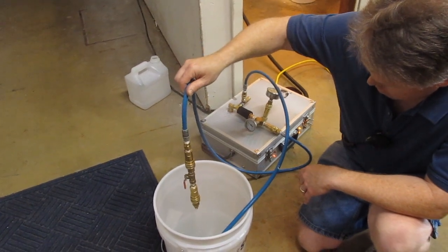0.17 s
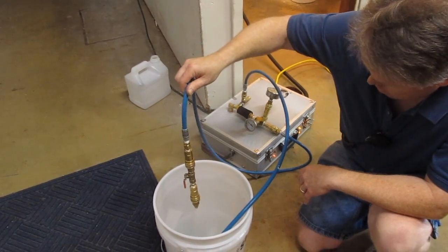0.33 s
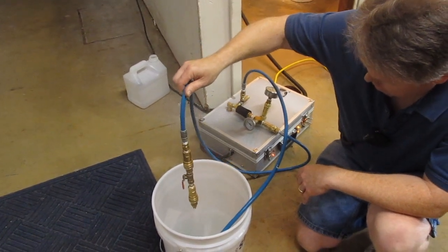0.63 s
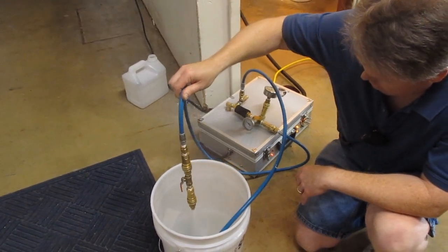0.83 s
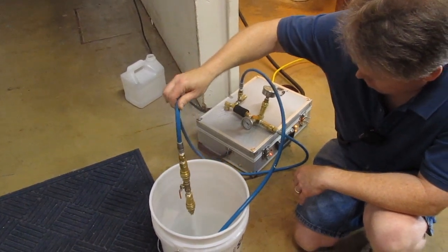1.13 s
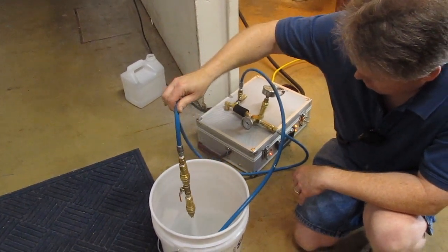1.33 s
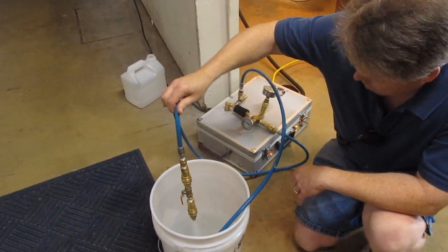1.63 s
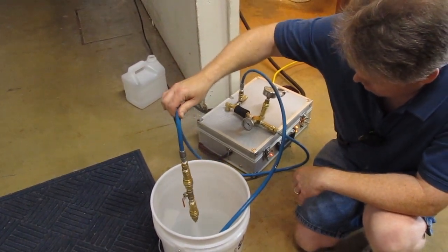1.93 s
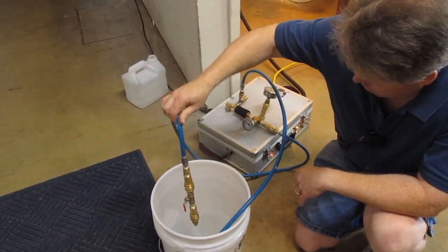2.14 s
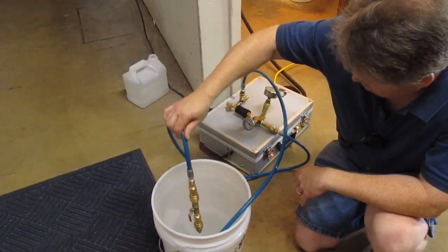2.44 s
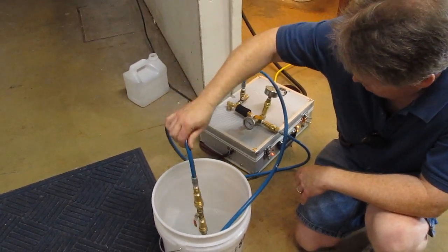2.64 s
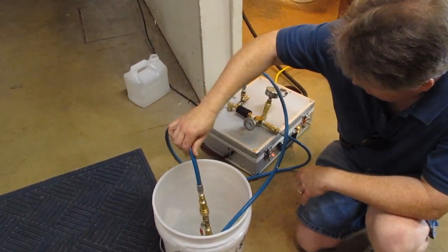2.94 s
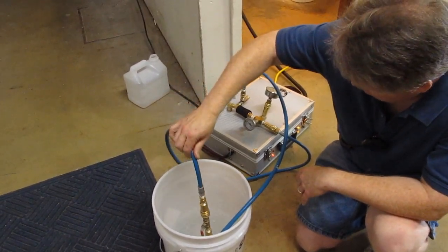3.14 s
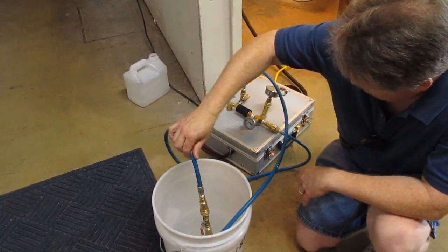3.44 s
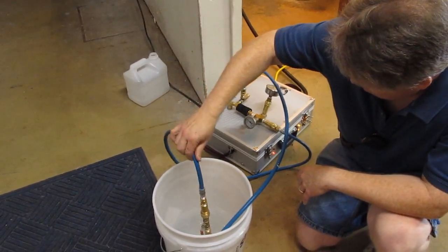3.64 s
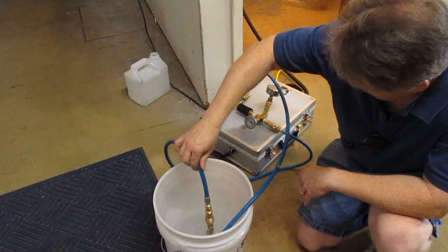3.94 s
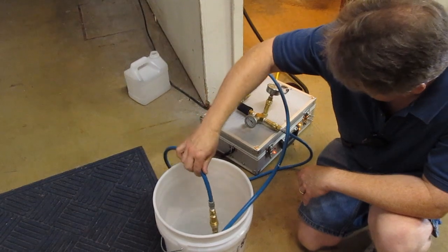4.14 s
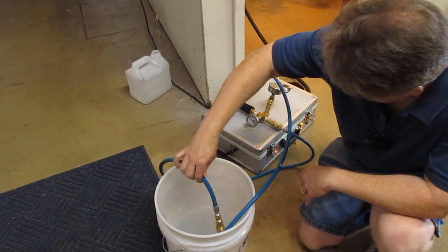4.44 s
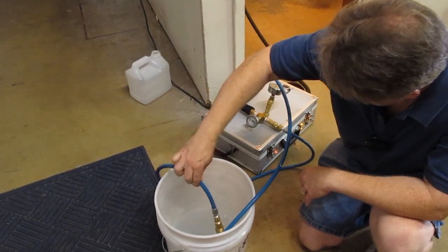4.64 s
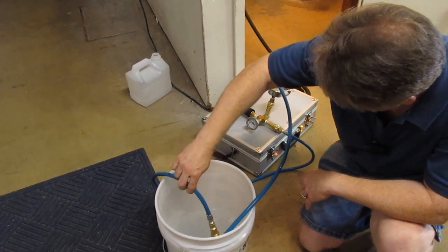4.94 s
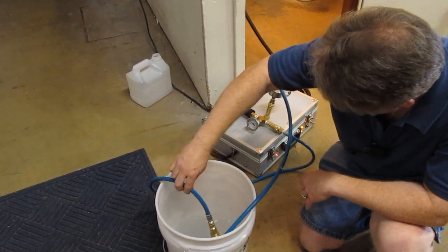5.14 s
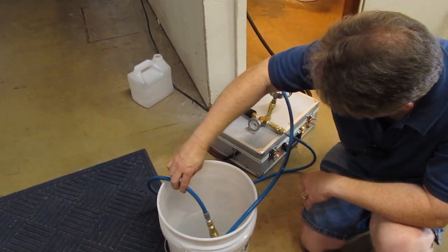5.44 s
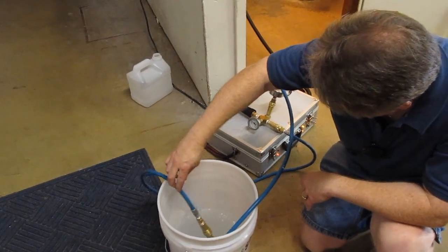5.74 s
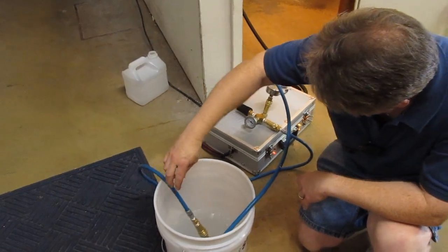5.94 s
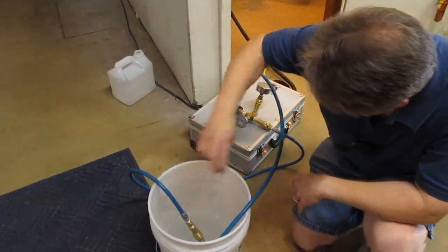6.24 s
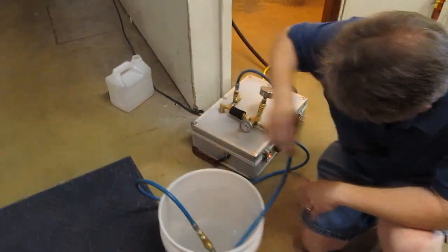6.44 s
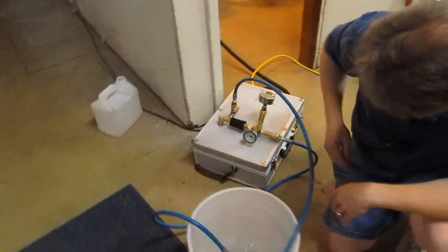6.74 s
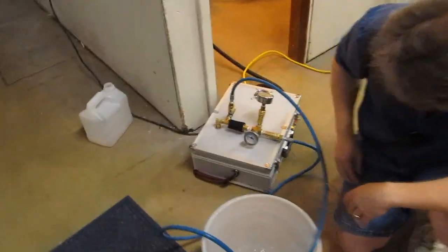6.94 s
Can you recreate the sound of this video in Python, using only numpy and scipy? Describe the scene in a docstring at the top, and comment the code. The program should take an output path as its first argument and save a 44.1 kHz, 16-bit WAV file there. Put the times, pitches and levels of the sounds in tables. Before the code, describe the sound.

A small electric pump hums while a nozzle sprays hissing water into a plastic bucket, plunges under with gulping bubbles, then scours the ringing wall.

```python
"""A small electric pump and its fan motor hum on a hard floor (sine tones, coloured noise) throughout, while
a hand-held nozzle sprays water into a plastic bucket (noise hiss and sizzle). The nozzle is lowered: from 2 s
the jet churns up froth and bubbles (patchy noise, damped sines). At 3.6 s it plunges under: a typed recorder
gain curve ducks the hum, gulps pass over bubble clouds and fizz. From 4.8 s it scours the wall and the bucket
rings (resonant noise)."""
import sys
import numpy as np
from scipy import signal
from scipy.fft import rfft, irfft, next_fast_len
from scipy.io import wavfile
from scipy.ndimage import uniform_filter1d, map_coordinates

SR = 44100
rng = np.random.default_rng(int(sys.argv[2]) if len(sys.argv) > 2 else 0)


def materialize(psi):
    """Save the field psi as 16-bit PCM at rate SR to the path in sys.argv[1].

    A 1-D psi becomes a single channel; in a 2-D psi each row is a channel.
    """
    bounded = np.clip(np.atleast_2d(psi).T, -1, 1)
    quanta = np.round(bounded * 32767).astype(np.int16)
    wavfile.write(sys.argv[1], SR, quanta)


def volts_from_db(level):
    """Convert decibel levels to linear amplitude ratios."""
    exponent = np.asarray(level, float) / 20
    return 10 ** exponent


N = 312669

# Spectra (f/Hz, level/dB per Hz) give the colour only: the noise is scaled to rms 1 before its gain.
# hum level as heard, with the recorder's slow gain changes, before the gain duck: t/s, level/dB
HUM_LEVEL = [(0, -39.5), (1.5, -41), (2.2, -40), (3.1, -36.5), (3.55, -36.5), (4.5, -36.5), (6.2, -39.5),
             (6.7, -38), (7.09, -38.5)]
# magnetic hum re hum level: f/Hz, level/dB rms (first row: only f is used, its level is 0 dB)
MAINS_TONES = [(119.95, -5), (239.9, -2.5)]
# beat of twice the fan's speed with the mains hum: rate/Hz, time of a swell/s, level re first hum tone/dB
FAN_BEAT = (2.02, 0.54, -16)
# fan motor tones re hum level: f/Hz, level/dB rms
FAN_TONES = [(58.96, -20.5), (144.7, -15.5), (190.5, -17.5), (522, -17.5), (589.7, -19)]
# pump shaft orders re hum level: multiple of shaft rate, level/dB rms
SHAFT_ORDERS = [(3, -25), (4, -33), (5, -20), (6, -13), (8, -28), (9, -11), (11, -4.5), (12, -10.5),
                (14, -19.5), (16, -14), (18, -7.5), (20, -18), (22, -18.5), (24, -11), (27, -16.5)]
# rush of the pump case: f/Hz, level/dB per Hz
CASE_SPECTRUM = [(12, -55), (20, -23), (65, -21), (90, -14), (118, -16), (183, -11.5), (245, -2.5),
                 (360, -4), (519, -5.5), (890, -10), (1280, -5.5), (1560, -8.5), (2000, -9), (2600, -23),
                 (4400, -120)]
# faint steady hiss of the room: f/Hz, level/dB per Hz
ROOM_SPECTRUM = [(1500, -40), (3000, -3), (8000, 0), (12000, -7), (15800, -5)]
# open spray as the nozzle is lowered, before spits: t/s, hiss level/dB, top sizzle level/dB
SPRAY_LEVELS = [(0, -20, -24.5), (.5, -18.5, -21.5), (1.16, -20.5, -23.5), (1.75, -19.5, -24),
                (2.32, -21, -25), (2.77, -20.5, -27), (3.0, -23.5, -30.5), (3.35, -20, -28),
                (3.65, -22.5, -23)]
# spray hiss: f/Hz, level/dB per Hz
HISS_SPECTRUM = [(410, -50), (700, -28), (804, -9.5), (871, -21), (1020, -24), (1260, -15.5), (1950, -10),
                 (2760, -2.5), (3100, -5.5), (4430, -1.5), (5380, -3.5), (6470, 0.5), (7870, -1.5),
                 (11000, -9), (14300, -17), (22000, -120)]
# top sizzle of the spray: f/Hz, level/dB per Hz
SIZZLE_SPECTRUM = [(5290, -33), (9000, -2), (12800, -2), (15100, -7.5), (15700, -10)]
# the nozzle spits at the surface: t/s, length/s, hiss lift/dB, sizzle lift/dB
SPITS = [(2.888, .04, 1, 3), (3.0, .05, -3, 6), (3.056, .06, 2.5, 1), (3.17, .03, -1, 5),
         (3.227, 0.063, -2, 7.5), (3.517, 0.027, 3, 8), (3.564, .03, 5, 2), (3.613, 0.04, 4.5, 9)]
# depth of the jet's bite in the water, as froth level: t/s, level/dB
FROTH_LEVEL = [(2.0, -37), (2.47, -27), (2.93, -24), (3.44, -25.5), (3.65, -30)]
# froth: f/Hz, level/dB per Hz
FROTH_SPECTRUM = [(500, -33), (800, -10.5), (1300, -5), (1740, -3.5), (2020, -7.5), (2300, 2.5),
                  (2560, -3.5), (2880, -3.5), (3200, -6), (4300, -6.5), (5500, -14), (7200, -38),
                  (12000, -120)]
# large single bubbles: t/s, level before swell and decay/dB, starting f/Hz, t60/s
LARGE_BUBBLES = [(2.445, -23, 1298, 0.12), (2.5, -24, 263, 0.25), (2.895, -17, 335, 0.15),
                 (3.0, -24, 285, .25), (3.04, -23, 290, .2), (3.185, -19, 260, .18), (3.225, -19, 269, .2),
                 (3.285, -19, 276, .2), (3.33, -19, 282, .15), (3.38, -14.5, 270.5, 0.21),
                 (3.486, -12, 306, 0.11), (3.571, -17.5, 266, 0.16), (3.77, -27, 739, 0.062),
                 (4.11, -19.5, 703, 0.06), (4.271, -22.5, 1240, 0.19)]
# jet under water, gathering force, before gulps: t/s, fizz level/dB, finest fizz level/dB
FIZZ_LEVELS = [(3.64, -33, -40), (3.72, -36, -49), (4.07, -34.5, -48), (4.17, -32, -44), (4.21, -29, -36.5),
               (4.31, -27.5, -37.5), (4.35, -26.5, -29.5), (4.64, -22, -21.5), (4.775, -17.5, -21.5)]
# fizz: f/Hz, level/dB per Hz
FIZZ_SPECTRUM = [(700, -26), (1200, -14), (1800, -9.5), (2300, -3.5), (3100, -4.5), (4000, -11), (4600, -4),
                 (5500, -10), (6300, -11), (8000, -24), (10400, -46), (17000, -120)]
# finest fizz: f/Hz, level/dB per Hz
FINEST_SPECTRUM = [(4120, -22), (7000, -5), (8700, -4), (9990, -8.5), (11300, -12.5), (12100, -15),
                   (14000, -19), (15700, -26)]
# centre pitch of the bubble cloud: t/s, f/Hz
CLOUD_PITCH = [(3.64, 2400), (3.95, 2650), (4.12, 2405), (4.3, 2260), (4.62, 2200), (4.7, 2750),
               (4.775, 2950)]
# gulps of air pass the sunken nozzle: t/s, length/s, lift/dB, small-bubble cloud level/dB
GULPS = [(3.78, 0.077, 3.5, -34), (3.867, .07, 6.5, -43), (3.957, .06, 9.5, -29.5), (4.122, 0.065, 6, -56),
         (4.198, 0.035, 3, -34), (4.268, 0.076, 1.5, -25.5), (4.339, 0.048, 1, -27), (4.4, .08, -0.5, -33),
         (4.48, .1, 1.5, -31), (4.594, 0.14, -0.5, -29.5), (4.697, .1, 0.5, -39)]
# jet on the wall: t/s, ringing level/dB, scour level/dB
WALL_LEVELS = [(4.79, -20.5, -25), (5.24, -19, -22.5), (5.6, -19.5, -22.5), (5.71, -18.5, -19.5),
               (6.1, -20, -22.5), (6.33, -18.5, -22), (7.09, -17.5, -24.5)]
# bucket modes: f/Hz, width/Hz, level/dB for each of five resting places of the nozzle
BUCKET_MODES = [(1074, 40, -16, -19, -23, -17, -24), (1228, 21.5, -6, -3, -8, -14, -6),
                (1351, 27, -1.5, -3, -5.5, -11.5, -12), (1513, 29, -5, -1.5, -6, -14, -5),
                (1608, 35, -2.5, -1, -2, -10, -4), (1714, 47, -4, -0.5, -5, -7.5, 0.5),
                (1856, 40, -15, -6, -5, -10, -11), (1994, 40, -8.5, -7, -2.5, -3, -5),
                (2150, 35, -19, -1.5, -10, -6, -1), (2216, 37, -13, 0.5, -1.5, -2.5, -0.5),
                (2487, 83, -18, -10, -11, -18, -4.5), (2757, 90, -11.5, -14, -8.5, -10.5, -4.5),
                (2945, 52, -13, -9, -9, -4.5, -6), (3417, 55, -12, -13, -6.5, -15, -8),
                (4190, 230, -15.5, -16, -16.5, -22, -17), (4840, 200, -16.5, -12, -16, -22, -16),
                (5270, 120, -18, -10, -9, -11.5, -8), (5460, 90, -22, -20, -18, -20, -3),
                (5780, 67, -15, -9, -6, -10.5, -5), (6106, 62, -16, -2.5, -0.5, -17, -5),
                (6320, 88, -31, -11, -16, -10, 0.5), (6870, 105, -22, -4.5, -8, -11.5, -3.5),
                (7220, 130, -14, -9, -7, -13, -10), (8100, 410, -20, -14, -16, -21.5, -24)]
# the nozzle shifts to its next resting place: mid t/s, length/s
NOZZLE_SHIFTS = [(5.38, 0.32), (5.79, 0.17), (6.202, 0.094), (6.73, 0.34)]
# scouring wash: f/Hz, level/dB per Hz
WASH_SPECTRUM = [(530, -29), (900, -14.5), (1510, -26), (1700, -2.5), (2430, -9), (3020, -1.5),
                 (3830, -9.5), (7060, -7), (12800, -17.5), (15700, -29)]
# two microphones in the open air: f/Hz, likeness 0-1, left lead/rad
OPEN_EARS = [(100, 0.94, 0), (400, 1, 0), (646, 0.71, -0.047), (1500, 0.99, 0.35), (2900, 0.65, -.2),
             (4000, 0.63, -0.6), (5100, .5, -0.03), (6030, 0.37, 0.21), (6700, 0.82, 0), (9000, 0.76, 0.27),
             (12300, 0.63, .25), (13300, 0.6, .9), (15500, .8, 0)]
# two microphones on sounds inside the bucket: f/Hz, likeness 0-1, left lead/rad
BUCKET_EARS = [(100, .99, 0), (600, 0.97, 0.85), (1540, 0.75, 0), (2430, 0.73, -0.78), (4000, 0.65, -0.91),
               (5500, 0.48, -0.063), (7600, 0.78, 0.82), (9500, 0.24, -0.62), (10900, 0.61, -0.063),
               (12000, .25, -1.4), (13000, .3, -.6), (15500, .55, -.2)]
# stereo balance: f/Hz, left minus right/dB
BALANCE = [(60, -3), (130, -2.5), (290, -2.5), (640, -0.5), (1410, -2), (3100, -2.0), (6820, -2.5),
           (15000, -3.0)]
# narrow notch of the recorder: f/Hz, width/Hz, depth 0-1
RECORDER_NOTCH = (7870, 110, .66)

PUMP_HZ = 24.73
PLUNGE_S = 3.622  # the nozzle goes under water
DUCK_DB, DUCK_RECOVERY_S = -9, 0.21  # recorder gain duck on the hum at the loud plunge; its recovery
CHOKE_S, LINGER_DB, LINGER_T60_S = 0.0022, -11.5, 0.43  # water shuts the spray off; a weak echo lingers
GURGLE_DB, GURGLE_RISE_DB_PER_S, GURGLE_LUMPS_DB = -31, 16, 2  # level from 3 s; rise until then; unevenness
CLOUD_DB, CLOUD_DB_PER_FIZZ_DB = -33.5, 0.73  # bubble cloud at a fizz of -30 dB; growth with fizz
FIZZ_SHARE = 0.84  # share of a gulp's lift in dB that the fizz takes
BAND_LIMIT_HZ = 15770


def unit(x):
    """Scale to rms 1."""
    return x / np.sqrt(np.mean(x ** 2) + 1e-20)


def along(points, hz, axis=1):
    """One column of (f/Hz, values) points on a log axis."""
    table = np.transpose(points)
    return np.interp(np.log(hz + 1), np.log(table[0] + 1), table[axis])


def gains(rows, fade_s=0.025):
    """Gain per sample for each dB column, fading outside the rows."""
    s, *columns = np.transpose(rows)
    t = np.arange(N) / SR
    fade = np.clip(np.minimum(t - s[0], s[-1] - t) / fade_s + 1, 0, 1)
    return np.array([fade * volts_from_db(np.interp(t, s, column)) for column in columns])


def wobble(rate_hz):
    """Smooth random curve, rate_hz knots a second."""
    knots = rng.standard_normal(int(N * rate_hz / SR) + 4)
    return map_coordinates(knots, [np.arange(N) * rate_hz / SR])


def bumps(rows):
    """One smooth hump of height 1 per (t/s, length/s) row."""
    s, length_s = np.transpose(rows)[:2, :, None]
    return np.exp(-(2 * (np.arange(N) / SR - s) / length_s) ** 2)


def in_air():
    """Gain 1 until the plunge, then a quick cut and a weak decaying echo."""
    after_s = np.maximum(np.arange(N) / SR - PLUNGE_S, 0)
    cut = (1 - volts_from_db(LINGER_DB)) * np.exp(-after_s / CHOKE_S)
    return cut + volts_from_db(LINGER_DB - 60 * after_s / LINGER_T60_S)


def filtered(x, response):
    """x times a complex response of frequency."""
    m = next_fast_len(N + 8192)
    return irfft(rfft(x, m) * response(np.fft.rfftfreq(m, 1 / SR)), m)[..., :N]


def shape(points):
    """Response of a (f/Hz, level/dB) spectrum."""
    return lambda hz: volts_from_db(along(points, hz))


def resonant(modes):
    """Sum of second-order resonances (f/Hz, width/Hz, level/dB) of alternating sign."""
    def mode(f, centre, width, db):
        return volts_from_db(db) * 1j * f * width / (centre * centre - f * f + 1j * f * width)
    return lambda f: sum((-1) ** k * mode(f, *row) for k, row in enumerate(modes))


def spread(pair, response, ears):
    """Two unrelated sounds coloured and mixed to left and right of given likeness and phase; rms 1."""
    def mid_side(hz):
        angle = np.arccos(np.clip(along(ears, hz), -1, 1)) / 2
        return response(hz) * [np.cos(angle), np.sin(angle)]

    def lead(hz):
        return np.exp(.5j * along(ears, hz, axis=2) * np.array([[1], [-1]]))

    mid, side = filtered(pair, mid_side)
    return unit(filtered(np.array([mid + side, mid - side]), lead))


def rush(response, ears, patchy_db, spiky_db):
    """Stereo noise: patches of random gain, and droplets that spike within milliseconds; rms 1."""
    spiky = rng.standard_normal((2, N)) * volts_from_db(spiky_db * wobble(700))
    z = signal.stft(spiky, nperseg=512)[2]
    field = uniform_filter1d(rng.standard_normal(z.shape[1:]), size=6, axis=0)
    field = uniform_filter1d(field, size=12, axis=1)
    patchy = signal.istft(z * volts_from_db(patchy_db * unit(field)), nperseg=512)[1][:, :N]
    return spread(patchy, response, ears)


def tones(lines, waver_db, drift_s):
    """Sines of given rms dB, each wavering a little; drift_s shifts them all in time."""
    t = np.arange(N) / SR
    out = 0
    for hz, db in lines:
        sine = np.sin(2 * np.pi * (hz * (t + drift_s) + rng.random()))
        out = out + 2 ** .5 * volts_from_db(db + waver_db * wobble(7)) * sine
    return out


def cloud(s, hz, ears, count, scatter, cycles, size_db):
    """Bubbles: damped sines of rising pitch scattered around a moving centre; rms 1 while they last."""
    when = rng.random((2, count, 1))
    high = rng.standard_normal((2, count, 1))
    big = rng.exponential(size=(2, count, 1))
    start = s[0] + when * (s[-1] - s[0])
    k = np.arange(int(10 * cycles * SR / np.min(hz)))
    turns = np.interp(start, s, hz) * np.exp(scatter * high) * k / SR
    envelope = volts_from_db(size_db * big) * np.exp(scatter * high / 2) * turns * np.exp(-turns / cycles)
    rings = envelope * np.sin(2 * np.pi * turns * (1 + .0012 * turns))
    pair = [np.bincount((i + k).ravel(), ring.ravel(), N)[:N]
            for i, ring in zip((start * SR).astype(int), rings)]
    stereo = spread(np.array(pair), lambda f: f ** 2 / (f ** 2 + 210 ** 2), ears)
    return stereo * np.sqrt((s[-1] - s[0]) * SR / N)


def machine():
    """Mains hum, fan tones, pump orders on a shaft whose speed wanders, rush of the case, room hiss."""
    t = np.arange(N) / SR
    duck_db = DUCK_DB * (1 - in_air()) * np.exp(-np.abs(t - PLUNGE_S) / DUCK_RECOVERY_S)
    level = gains(HUM_LEVEL)[0] * volts_from_db(duck_db)
    beat_hz, swell_s, beat_db = FAN_BEAT
    beat = 1 + volts_from_db(beat_db) * np.exp(-2j * np.pi * beat_hz * (t - swell_s))
    turn = np.exp(2j * np.pi * MAINS_TONES[0][0] * t) * beat
    hum = 2 ** .5 * turn.real + tones(MAINS_TONES[1:], waver_db=1.0, drift_s=0)
    fan = tones(FAN_TONES, waver_db=2.5, drift_s=0)
    orders = [(k * PUMP_HZ, db) for k, db in SHAFT_ORDERS]
    pump = tones(orders, waver_db=2.0, drift_s=.0012 * wobble(1.5) + 0.00026 * wobble(12))
    room = volts_from_db(-17) * rush(shape(ROOM_SPECTRUM), OPEN_EARS, patchy_db=.5, spiky_db=1)
    case = volts_from_db(2.5) * rush(shape(CASE_SPECTRUM), OPEN_EARS, patchy_db=0.76, spiky_db=0.5)
    return level * (hum + fan + pump + room + case)


def spray():
    """Droplets tear out of the nozzle; hiss and sizzle noise flutter together."""
    lifts = volts_from_db(np.transpose(SPITS)[2:] @ bumps(SPITS))
    hiss, sizzle = gains(SPRAY_LEVELS, fade_s=0.11) * lifts * in_air()
    flutter = volts_from_db(0.49 * wobble(8.85) + 0.32 * wobble(34.86))
    body = rush(shape(HISS_SPECTRUM), OPEN_EARS, patchy_db=.7, spiky_db=1.2)
    top = rush(shape(SIZZLE_SPECTRUM), OPEN_EARS, patchy_db=.3, spiky_db=1.2)
    return flutter * (hiss * body + sizzle * top)


def churn():
    """The close jet whips up froth (patchy noise) and drags down gurgling bubbles."""
    froth = gains(FROTH_LEVEL)[0] * in_air() * volts_from_db(0.4 * wobble(23.2))
    rise_db = GURGLE_RISE_DB_PER_S * np.minimum(np.arange(N) / SR - 3, 0)
    gurgle = volts_from_db(GURGLE_DB + rise_db + GURGLE_LUMPS_DB * wobble(32)) * in_air()
    bubbles = cloud([FROTH_LEVEL[0][0], FROTH_LEVEL[-1][0]], [640, 560], OPEN_EARS,
                    count=2600, scatter=0.522, cycles=0.77, size_db=1.5)
    return froth * rush(shape(FROTH_SPECTRUM), OPEN_EARS, patchy_db=2.6, spiky_db=1.0) + gurgle * bubbles


def glugs():
    """Large bubbles swell within a few cycles and die with slightly rising pitch."""
    out, t = np.zeros(N), np.arange(SR // 3) / SR
    for s, db, hz, t60_s in LARGE_BUBBLES:
        swell = (1 - np.exp(-t * hz / 2.2)) * volts_from_db(db - 60 * t / t60_s)
        out[round(s * SR):][:len(t)] += swell * np.sin(2 * np.pi * hz * t * (1 + 0.33 * t))
    return out


def submerged():
    """Two bubble clouds sing under water over patchy fizz that brightens with force."""
    fizz, finest = gains(FIZZ_LEVELS)
    humps, (lift_db, small_db) = bumps(GULPS), np.transpose(GULPS)[2:]
    lift, small = volts_from_db(lift_db @ humps), volts_from_db(small_db) @ humps
    body = volts_from_db(CLOUD_DB) * (fizz / volts_from_db(-30)) ** CLOUD_DB_PER_FIZZ_DB
    swarm = cloud(*np.transpose(CLOUD_PITCH), BUCKET_EARS, count=2000, scatter=0.075, cycles=6, size_db=1.5)
    thin = cloud([FIZZ_LEVELS[0][0], FIZZ_LEVELS[-1][0]], [3600, 3540], BUCKET_EARS,
                 count=900, scatter=.04, cycles=8, size_db=1.6)
    fizz_noise = rush(shape(FIZZ_SPECTRUM), BUCKET_EARS, patchy_db=1.7, spiky_db=1.5)
    finest_noise = rush(shape(FINEST_SPECTRUM), BUCKET_EARS, patchy_db=2.0, spiky_db=2.0)
    bubbles = lift * body * swarm + small * thin
    return volts_from_db(0.98 * wobble(25.15)) * (bubbles + lift ** FIZZ_SHARE * fizz * fizz_noise + finest * finest_noise)


def wall():
    """Jet noise drives the bucket's modes; each shift of the nozzle feeds them differently."""
    ringing, scour = gains(WALL_LEVELS)
    t, modes = np.arange(N) / SR, np.array(BUCKET_MODES)
    shifts = [np.clip((t - s) / length_s + .5, 0, 1) for s, length_s in NOZZLE_SHIFTS]
    moved = [np.ones(N)] + shifts + [np.zeros(N)]
    ring = 0
    for k in range(len(NOZZLE_SHIFTS) + 1):
        share = np.sqrt(np.abs(moved[k] - moved[k + 1]))  # equal-power crossfade
        response = resonant(modes[:, [0, 1, k + 2]])
        ring = ring + share * rush(response, BUCKET_EARS, patchy_db=1.1, spiky_db=1.0)
    wash = rush(shape(WASH_SPECTRUM), BUCKET_EARS, patchy_db=0.75, spiky_db=0.2)
    return volts_from_db(0.29 * wobble(14)) * (ringing * ring + scour * wash)


def scene():
    """All sources, leaning to the right."""
    mix = machine() + spray() + churn() + glugs() + submerged() + wall()
    return filtered(mix, lambda hz: volts_from_db(along(BALANCE, hz) / 2 * np.array([[1], [-1]])))


def top_cut(x):
    """Nothing passes above the cut-off."""
    return signal.sosfilt(signal.butter(12, 15890, fs=SR, output="sos"), x)


def record(dry):
    """The recorder cuts a narrow notch; a band limit removes all above it."""
    centre_hz, width_hz, depth = RECORDER_NOTCH

    def response(f):
        notch = depth / (1 + (2 * (f - centre_hz) / width_hz) ** 2)
        return (f < BAND_LIMIT_HZ) * (1 - notch)

    return top_cut(filtered(dry, response))


dry = scene()
out = record(dry)
materialize(out)
```